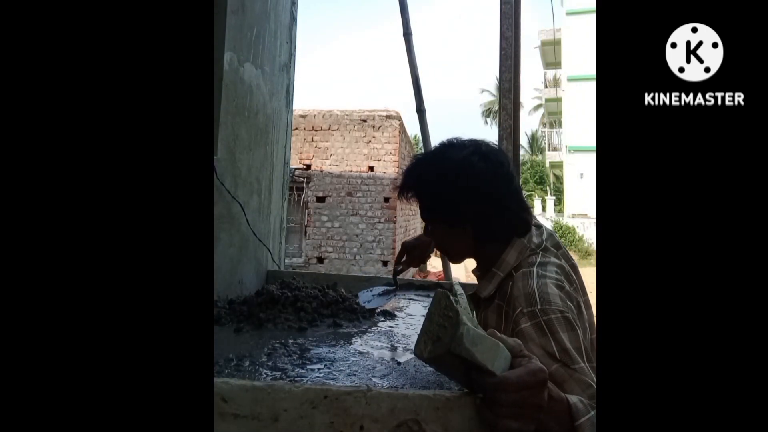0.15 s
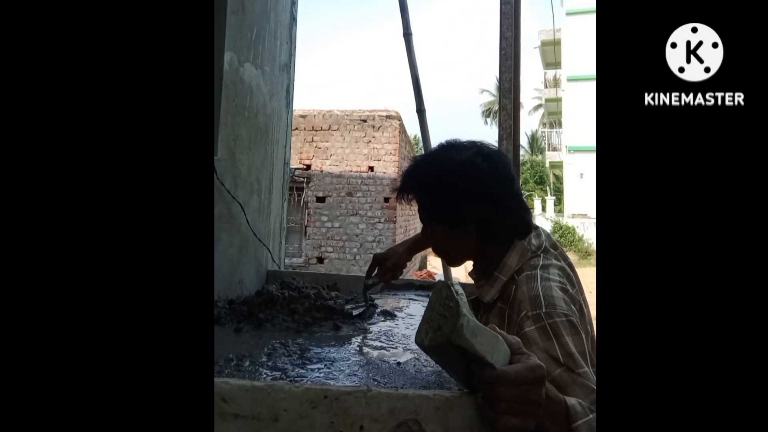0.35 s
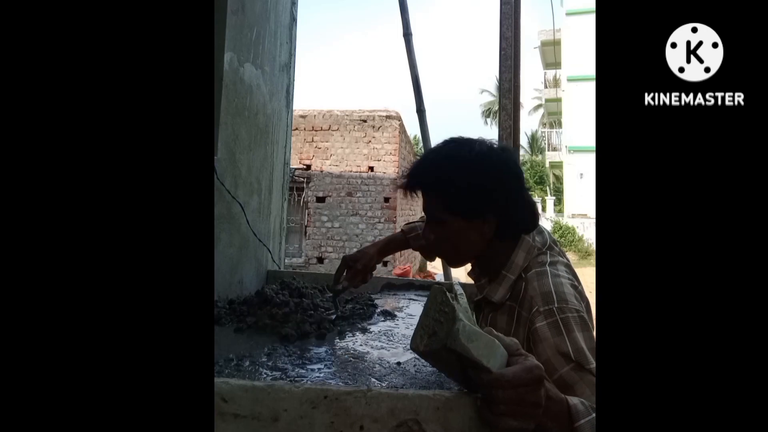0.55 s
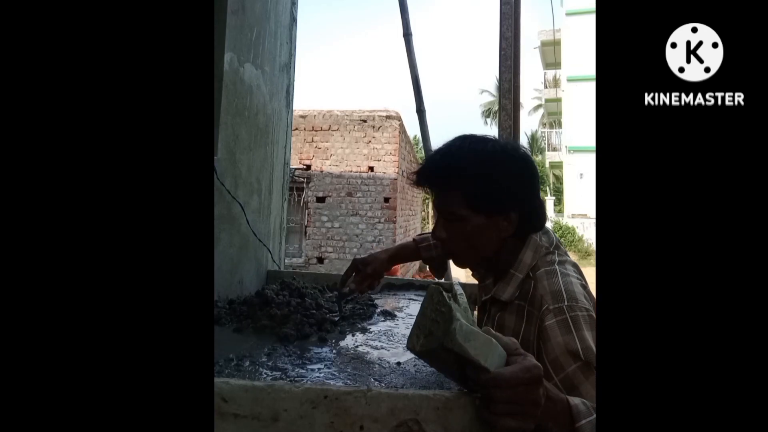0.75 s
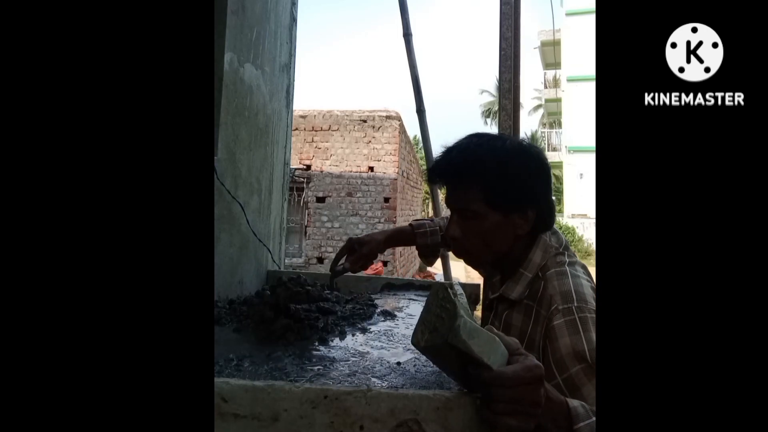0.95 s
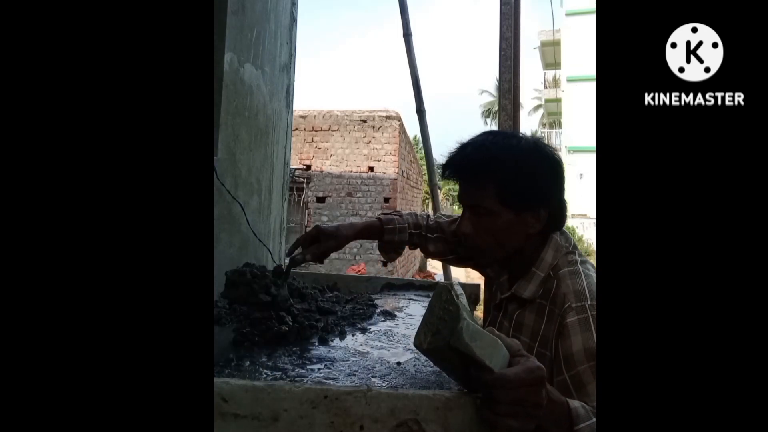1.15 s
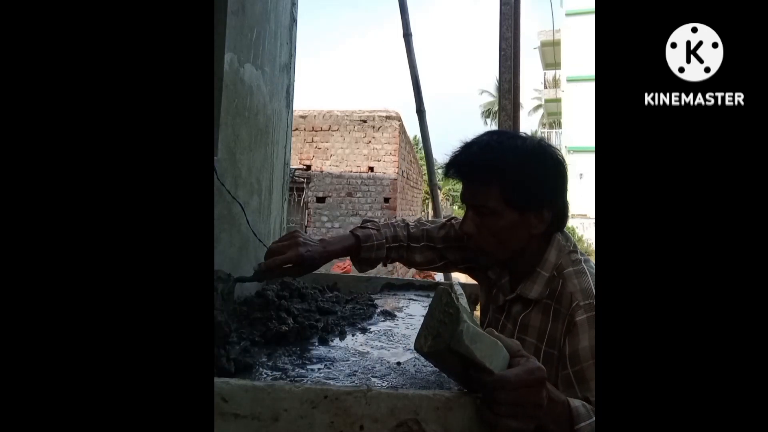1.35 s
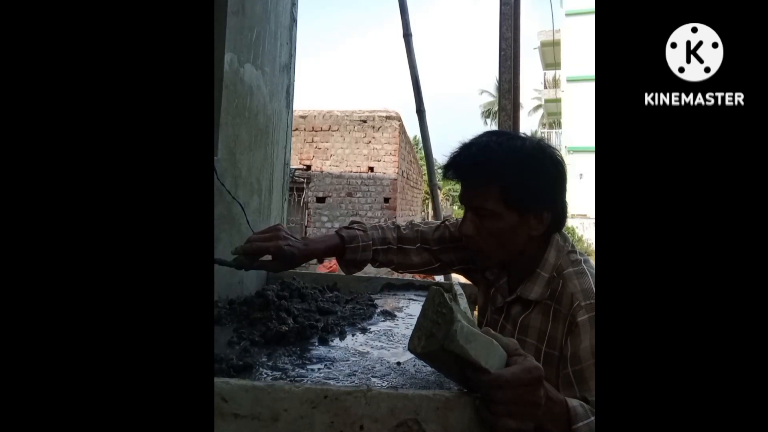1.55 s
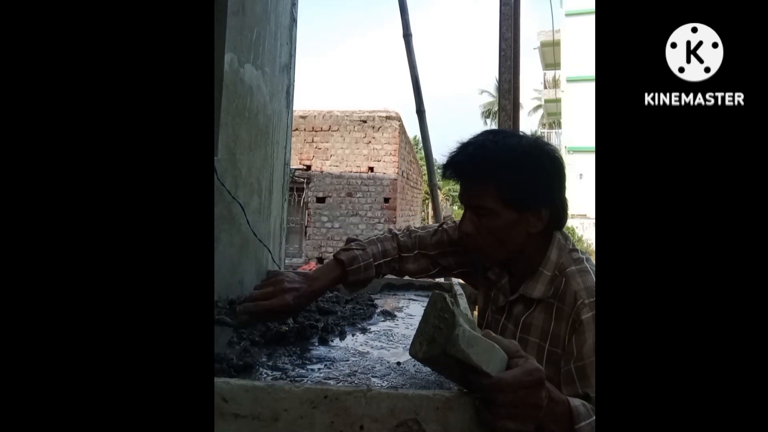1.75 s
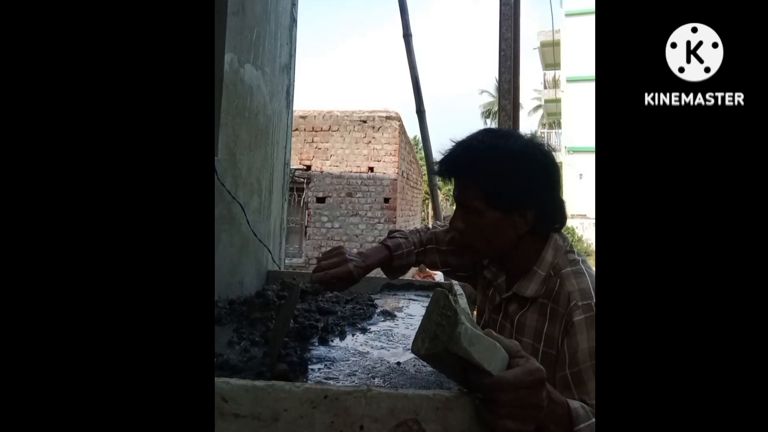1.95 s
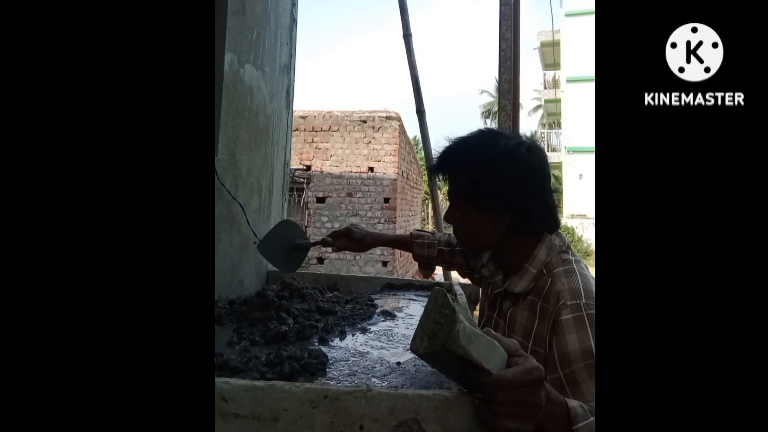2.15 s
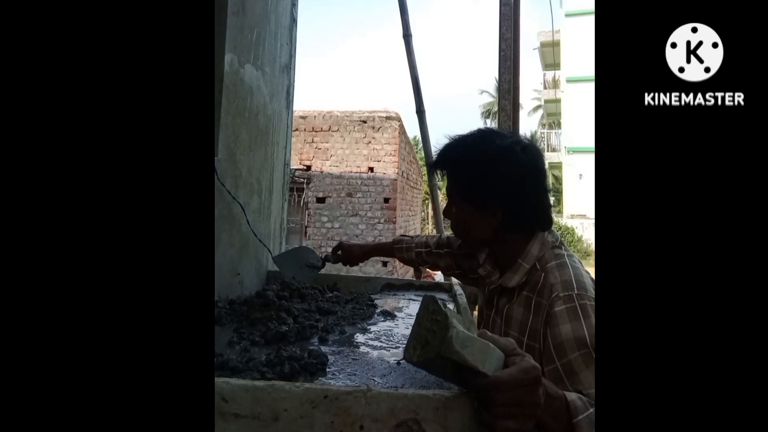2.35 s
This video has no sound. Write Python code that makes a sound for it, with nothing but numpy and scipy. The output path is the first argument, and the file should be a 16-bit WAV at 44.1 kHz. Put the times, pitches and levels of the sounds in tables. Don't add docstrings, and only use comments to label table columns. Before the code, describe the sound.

A steel trowel crunches and scrapes through wet gritty concrete, with stones clinking on the blade

```python
import sys
import numpy as np
from scipy import signal
from scipy.fft import rfft, irfft
from scipy.io import wavfile

SR = 44100
rng = np.random.default_rng(int(sys.argv[2]) if len(sys.argv) > 2 else 0)


def undo_db(level):
    steps = np.asarray(level, float) / 20
    return 10 ** steps


def bounce(signal):
    frames = np.transpose(np.atleast_2d(signal))
    limited = np.clip(frames, -1, 1)
    pcm = np.round(limited * 32767).astype(np.int16)
    wavfile.write(sys.argv[1], SR, pcm)


N = 105840


def rms_one(x):
    return x / np.sqrt(np.mean(x ** 2) + 1e-20)


def in_time(rows):
    start_s, *columns = np.transpose(rows)
    return [np.interp(np.arange(N) / SR, start_s, column) for column in columns]


def drift(rate_hz):
    r = np.exp(-2 * np.pi * rate_hz / SR)
    wander = signal.lfilter([1], [1, -2 * r, r * r], rng.standard_normal(N + SR))
    return rms_one(wander[SR:])


def swell(start_s, length_s, fade_s):
    t = np.arange(N) / SR - start_s
    return np.clip(np.minimum(t + fade_s / 2, length_s + fade_s / 2 - t) / fade_s, 0, 1)


def colour(x, points):
    pitch_hz, level_db = np.transpose(points)
    log_hz = np.log(np.arange(1, 4098) * SR / 8192)
    log_gain = np.interp(log_hz, np.log(pitch_hz), level_db) * np.log(10) / 20
    fold = irfft(log_gain) * np.r_[1, 2 * np.ones(4095), 1, np.zeros(4095)]
    impulse = irfft(np.exp(rfft(fold)))
    return signal.fftconvolve(x, impulse)[:len(x)]


def resonate(x, hz, width_hz):
    r = np.exp(-np.pi * width_hz / SR)
    edge = (1 - r * r) / 2
    return signal.lfilter([edge, 0, -edge], [1, -2 * r * np.cos(2 * np.pi * hz / SR), r * r], x + 1e-18)


def broad_noise(noise, hz, width_hz):
    return rms_one(resonate(resonate(noise, hz, width_hz), hz, width_hz))


def ring(peak_db, start_s, hz, t60_s):
    t = np.maximum(np.arange(N) / SR - start_s, 0)
    return undo_db(peak_db - 60 * t / t60_s) * np.minimum(t * hz, 1) * np.sin(2 * np.pi * hz * t)


# start_s, pressure_db, ring_centre_hz, ring_to_grit_db
PUSH_STROKES = [
    [(0.0, -56, 1200, 3.5), (0.05, -62, 1210, -8), (0.09, -60, 1170, -7), (0.098, -70.5, 1160, 13),
     (0.12, -41.5, 1200, -22), (0.146, -49, 1170, -1), (0.172, -53.5, 1190, -3), (0.208, -48, 1310, -10),
     (0.216, -44, 1300, -8)],
    [(0.222, -36.5, 1290, 4), (0.25, -29, 1280, -1.5), (0.286, -32, 1310, -7.5), (0.332, -27, 1350, 0),
     (0.358, -35, 1410, 9), (0.374, -31.5, 1330, 1), (0.396, -34.5, 1230, 10.5), (0.448, -30, 1310, 6),
     (0.5, -25, 1100, 3.5)],
    [(0.505, -23.5, 1120, 0.5), (0.543, -25.5, 1084, 3), (0.587, -22, 900, -2), (0.611, -25, 930, 2),
     (0.667, -22.5, 1360, -1.5), (0.701, -33, 1240, -0.5), (0.735, -36.5, 1400, 5.5),
     (0.78, -51, 1290, 4.5)],
]
# start_s, pressure_db, ring_centre_hz, ring_to_grit_db
SLUMP_STROKES = [
    [(0.785, -50, 1120, -5), (0.795, -45.5, 1100, -6), (0.825, -53, 1100, 4.5), (0.903, -46.5, 1130, -1),
     (0.933, -40, 790, -3), (0.977, -45.5, 804, 8), (0.993, -43.5, 950, -11), (1.005, -43.5, 1070, 2),
     (1.1, -49.5, 990, -8)],
    [(1.105, -46.5, 1070, -5), (1.137, -45, 1180, -15), (1.197, -50, 1190, -1), (1.241, -47.5, 1170, -10),
     (1.249, -51, 1120, 2), (1.277, -49.5, 1090, -16), (1.295, -47.5, 1155, 3.5), (1.369, -55, 1100, -7.5),
     (1.434, -47.5, 969, 3)],
]
# start_s, pressure_db, ring_centre_hz, ring_to_grit_db
SPREAD_STROKES = [
    [(1.456, -31, 1240, -26), (1.482, -35.5, 1130, -4), (1.512, -36.5, 1400, -13), (1.532, -31, 1370, -5),
     (1.566, -28.5, 1400, -5), (1.606, -42.5, 1250, -5), (1.668, -42.5, 1190, -6)],
    [(1.715, -54, 893, 4.5), (1.743, -61.5, 900, -4), (1.761, -56.5, 895, -17), (1.791, -75, 962, -7),
     (1.851, -86, 708, -12), (1.861, -56, 714, -15), (1.869, -60, 713, -19), (1.886, -46, 720, -19)],
    [(1.892, -26, 1080, -3.5), (1.902, -21.5, 1040, -12.5), (1.914, -36.5, 1050, -5.5),
     (1.944, -28.5, 1100, -12), (1.976, -32.5, 1130, -9), (2.004, -29, 1100, -6.5),
     (2.058, -23.5, 1000, -10), (2.068, -29, 990, -6), (2.13, -31.5, 1390, -4)],
    [(2.135, -35.5, 1090, -13), (2.153, -46, 1090, -1), (2.161, -46, 1140, -7), (2.177, -44.5, 1300, -8),
     (2.205, -46, 1270, -8), (2.261, -57.5, 1130, -0.5), (2.291, -59, 1170, -27), (2.315, -69, 1100, 4),
     (2.4, -70, 1070, -3)],
]
# pitch_hz, level_db
BLADE_MODES = [(625, -46), (720, -45), (781, -43), (860, -43), (948, -42), (1065, -42), (1174, -43),
               (1290, -43), (1414, -42), (1547, -43), (1760, -42), (1965, -41), (2133, -40), (2600, -42)]
RING_SPREAD_OCT, RING_SKIRT_DB, RING_WIDTH_HZ = 0.38, -16, 55
RING_DB, SHUDDER_DB = -1, -41


def scrape():
    pressure_db, centre_hz, ring_db = in_time(sum(PUSH_STROKES + SLUMP_STROKES + SPREAD_STROKES, []))
    drive = grit()
    rings, power = 0, 0
    for k, (hz, level_db) in enumerate(BLADE_MODES):
        nearness = np.exp(-(np.log2(hz / centre_hz) / RING_SPREAD_OCT) ** 2)
        gain = (nearness + undo_db(RING_SKIRT_DB)) * undo_db(level_db)
        flicker_db = 4.0 * drift(18)
        rings = rings + (-1) ** k * resonate(drive * gain * undo_db(flicker_db), hz, RING_WIDTH_HZ)
        power = power + gain ** 2
    direct = rms_one(patchy(grit_colour(drive), centre_hz))
    blade = undo_db(RING_DB + ring_db) * rms_one(rings / np.sqrt(power))
    shudder = undo_db(SHUDDER_DB) * broad_noise(rng.standard_normal(N), 200, 130)
    return undo_db(pressure_db) * (direct + blade + shudder)


SNAPS_PER_S, SNAP_SPREAD_DB, SLURRY_SHARE, CLUMP_DB = 2500, 0.5, 0.73, 1.0


def grit():
    sizes = undo_db(SNAP_SPREAD_DB * np.minimum(rng.exponential(1, N), 5)) * rng.choice([-1, 1], N)
    snaps = sizes * (rng.random(N) < SNAPS_PER_S / SR)
    slurry = SLURRY_SHARE * rng.standard_normal(N)
    return rms_one((rms_one(snaps) + slurry) * undo_db(CLUMP_DB * drift(58)))


# pitch_hz, level_db
GRIT_LOW = [(180, -34.5), (300, -21.5), (556, -20.5), (647, -8.5), (910, -8.5), (2200, -7.5), (3150, -1),
            (4100, -9.5), (5300, -1.5), (6100, -3.5), (7930, -30), (13400, -120)]
# pitch_hz, level_db
GRIT_HIGH = [(3820, 8), (6500, 0.5), (6850, -3.5), (8210, -26.5), (11800, -31), (13500, -35.5), (14900, -9),
             (15600, -14), (16000, -14.5)]
TREBLE_DB = -7


def grit_colour(x):
    low = [(hz, level_db) for hz, level_db in GRIT_LOW if hz < 6200]
    high = [(hz, level_db + TREBLE_DB) for hz, level_db in GRIT_HIGH if hz > 6200]
    return colour(x, low + high)


# start_s, treble_db
DRYNESS = [(0, 12.5), (.4, 5), (.7, 1), (1.6, 3.5), (2.4, 3)]
SINK_DB_PER_OCT, SINK_HZ = 13, 1100
PATCH_DB, PATCH_PER_S = 2.6, 20


def patchy(x, centre_hz):
    dry_db, = in_time(DRYNESS)
    sunk_db = SINK_DB_PER_OCT * np.log2(SINK_HZ / centre_hz)
    out, below = 0, 0
    for hz, dry_share in ((900, 0), (1800, 0), (2600, 0), (3400, 0),
                          (4600, 0), (5600, .4), (7000, .4), (20000, 1)):
        upto = signal.sosfiltfilt(signal.butter(2, hz, fs=SR, output="sos"), x)
        gain_db = PATCH_DB * drift(PATCH_PER_S) + dry_share * dry_db + sunk_db * (hz < 1000)
        out = out + (upto - below) * undo_db(gain_db)
        below = upto
    return out


# start_s, peak_db, pitch_hz
STONES = [(0.121, -25.5, 5350), (0.259, -28, 6200), (0.224, -24, 1120), (0.237, -27, 2560),
          (0.31, -14.5, 1200), (0.797, -32, 6000), (0.921, -27.5, 3100), (0.946, -31, 753),
          (0.99, -22, 2750), (1.035, -27.5, 2600), (1.139, -27, 3350), (1.168, -29, 3500),
          (1.272, -26.5, 5300), (1.298, -36, 1260), (1.398, -27, 6050), (1.442, -10.5, 4980),
          (1.443, -22.5, 1400), (1.447, -21, 5640), (1.453, -21.5, 4770), (1.444, -13, 3160),
          (1.45, -12.5, 3150), (1.509, -19, 5860), (1.524, -12, 3000), (1.535, -14, 1370),
          (1.543, -11.5, 5500), (1.552, -22, 5530), (1.561, -12.5, 3100), (1.57, -18, 5600),
          (1.69, -36, 897), (1.706, -39.5, 830), (1.897, -21, 1383), (1.891, -18, 6000), (1.896, -19, 5630),
          (1.903, -20.5, 3480), (1.919, -13, 3300), (1.982, -29, 544), (2.126, -39, 512),
          (2.159, -23, 2900), (2.198, -31.5, 1290)]
SNAP_DB, RING_CYCLES, STONE_RING_DB = -4.5, 26, -3
CRUNCH_T60_S, SOFT_LOSS = 0.012, 0.6


def stones():
    length = 2048
    t = np.arange(length) / SR
    crunches, rings = np.zeros(N + length), 0
    for start_s, peak_db, hz in STONES:
        chips = rng.standard_normal(length) ** 3
        crunch = grit_colour(chips * undo_db(-60 * t / CRUNCH_T60_S))
        crunch_db = peak_db + SNAP_DB + SOFT_LOSS * min(peak_db + 15, 0)
        i = int(start_s * SR)
        crunches[i:i + length] += undo_db(crunch_db) * crunch / np.abs(crunch).max()
        rings = rings + ring(peak_db + STONE_RING_DB, start_s, hz, RING_CYCLES / hz)
    return crunches[:N] + signal.sosfilt(signal.butter(4, 6800, fs=SR, output="sos"), rings)


# start_s, peak_db
LUMP = [
    (1.6805, -20.5),
    (1.692, -31),
]
# pitch_hz, level_db, t60_s
BOARD_MODES = [(206, -17, 0.067), (396, -5, 0.025), (594, -11.5, 0.016), (767, -0.5, 0.013),
               (996, 8.5, 0.0086), (1400, -2.5, 0.014)]


def lump():
    return sum(ring(peak_db + level_db, start_s, hz, t60_s)
               for start_s, peak_db in LUMP for hz, level_db, t60_s in BOARD_MODES)


# start_s, length_s, level_db, pitch_hz
HEAVES = [(.0, 0.023, -62, 445), (0.39, 0.066, -51, 447), (0.693, 0.055, -47, 290), (1.01, 0.054, -52, 720),
          (1.447, 0.09, -55.5, 233), (1.713, 0.042, -59.5, 513), (2.094, 0.093, -56, 290),
          (2.0, 0.27, -74, 70)]


def heaves():
    noise = rng.standard_normal(N)
    return sum(undo_db(level_db) * swell(start_s, length_s, 0.09) * broad_noise(noise, hz, .8 * hz)
               for start_s, length_s, level_db, hz in HEAVES)


# start_s, length_s, level_db, pitch_hz
HUM = [(0.039, 0.1, -61.5, 237), (0.088, 0.051, -57, 322), (0, 0.13, -70, 161), (0.328, 0.079, -58, 237.6),
       (0.344, 0.049, -55, 307), (0.692, 0.032, -52, 356), (1.688, 0.15, -63, 235),
       (1.835, 0.041, -62, 166.6), (1.848, 0.039, -63.5, 700), (1.947, 0.063, -58.5, 147),
       (2.105, 0.12, -59.5, 164.4), (2.192, 0.078, -63.5, 1045), (2.303, 0.061, -64, 1054)]
HUM_FADE_S, HUM_WIDTH_HZ = 0.013, 6.1


def hum():
    out = 0
    for start_s, length_s, level_db, hz in HUM:
        phase = 2 * np.pi * np.cumsum(hz + HUM_WIDTH_HZ * drift(10.1)) / SR
        tone = np.sqrt(2) * undo_db(2.0 * drift(27)) * np.sin(phase)
        out = out + undo_db(level_db) * swell(start_s, length_s, HUM_FADE_S) * tone
    return out


GUST_START_S, GUST_END_S, GUST_DB, GUST_HZ = 1.44, 1.73, -63, 68


def gust():
    puff = broad_noise(rng.standard_normal(N), GUST_HZ, GUST_HZ)
    return undo_db(GUST_DB) * swell(GUST_START_S, GUST_END_S - GUST_START_S, .04) * puff


# pitch_hz, level_db
AIR = [(500, -32), (1050, -21.5), (2300, -32), (3200, -23), (4050, -35), (5600, -17), (7600, -43),
       (9500, -55)]
AIR_DB = -63.5
RUMBLE_DB, RUMBLE_HZ, RUMBLE_WIDTH_HZ = -72, 200, 125


def air_and_rumble():
    hiss = colour(rng.standard_normal(N), AIR)
    air = rms_one(signal.lfilter([1, -1], [1, -.992], hiss))
    rumble = broad_noise(rng.standard_normal(N), RUMBLE_HZ, RUMBLE_WIDTH_HZ)
    return undo_db(AIR_DB) * air + undo_db(RUMBLE_DB) * rumble


# delay_s, level_db
ECHOES = [(0.01, -15), (.023, -16), (.041, -24)]
PORT_CUT_HZ = 92


def scene():
    port = signal.butter(2, PORT_CUT_HZ, "high", fs=SR, output="sos")
    near = signal.sosfilt(port, scrape() + stones())
    walls = sum(undo_db(level_db) * np.r_[np.zeros(int(delay_s * SR)), near][:N] for delay_s, level_db in ECHOES)
    return (near + walls + lump() + heaves() + hum() + gust() + air_and_rumble())[None]


def top_cut(x):
    return signal.sosfilt(signal.butter(12, 16810, fs=SR, output="sos"), x)


def record(dry):
    ceiling = 0.45
    rounded = ceiling * np.tanh(dry / ceiling)
    mix = signal.sosfilt(signal.cheby2(14, 60, 15950, fs=SR, output="sos"), rounded)
    return top_cut(mix)


dry = scene()
out = record(dry)
bounce(out)
```